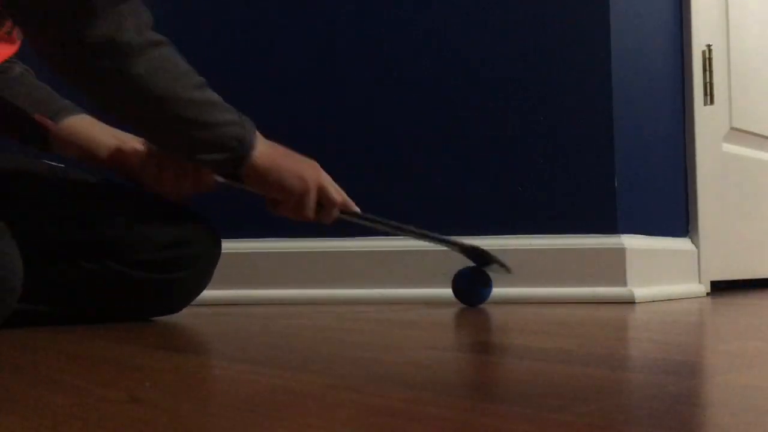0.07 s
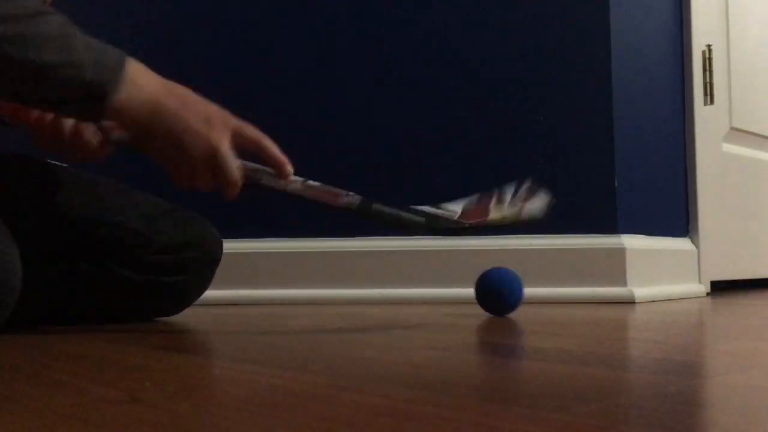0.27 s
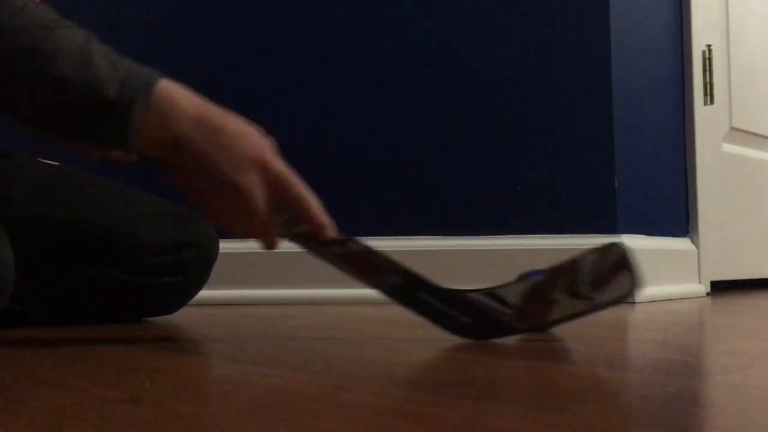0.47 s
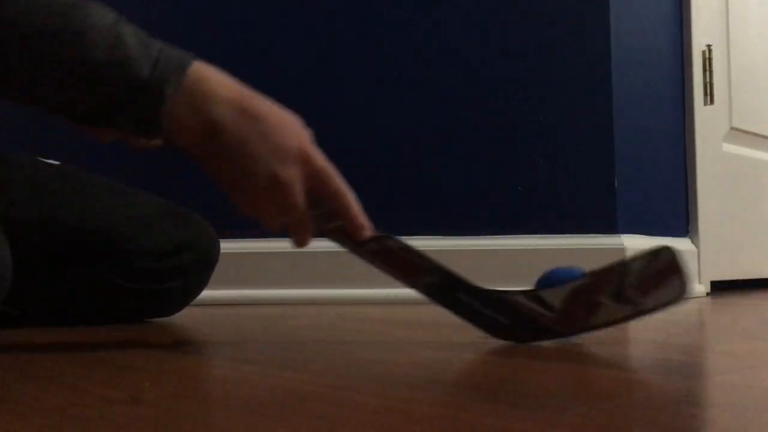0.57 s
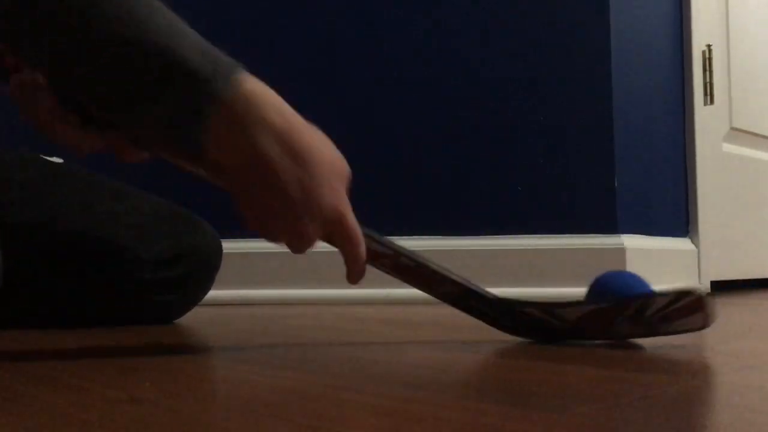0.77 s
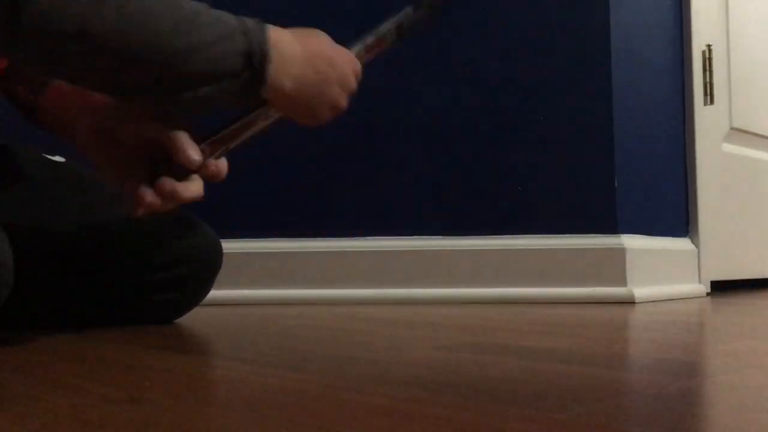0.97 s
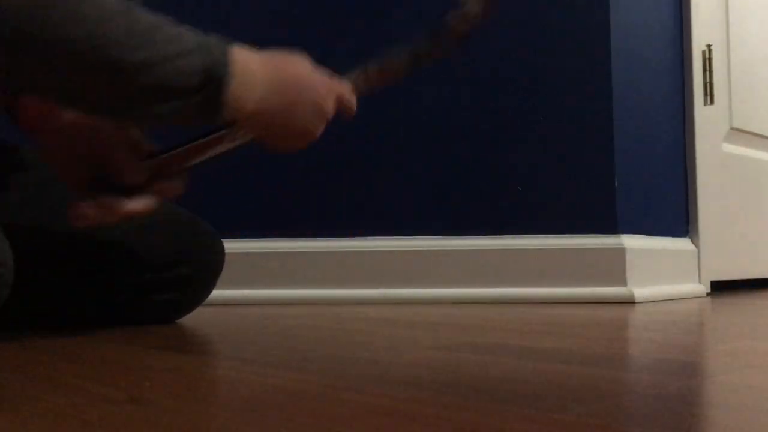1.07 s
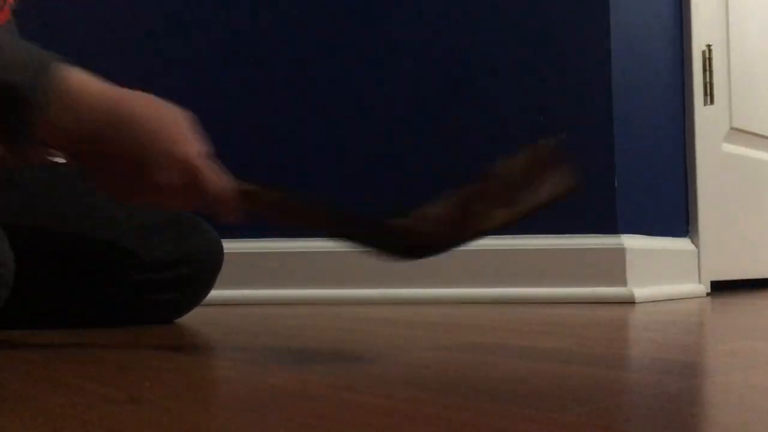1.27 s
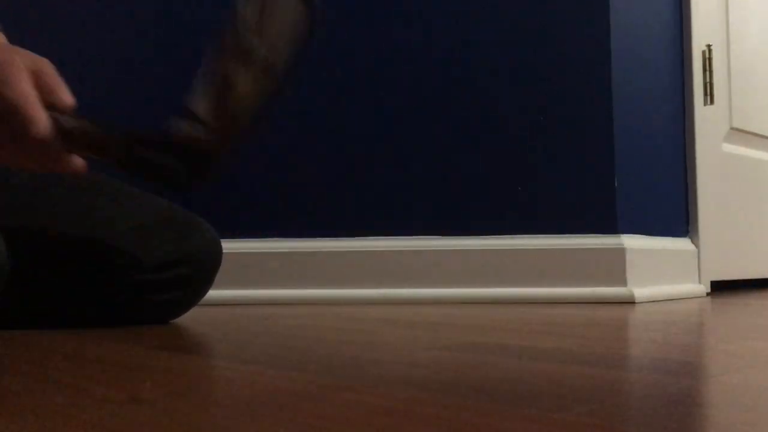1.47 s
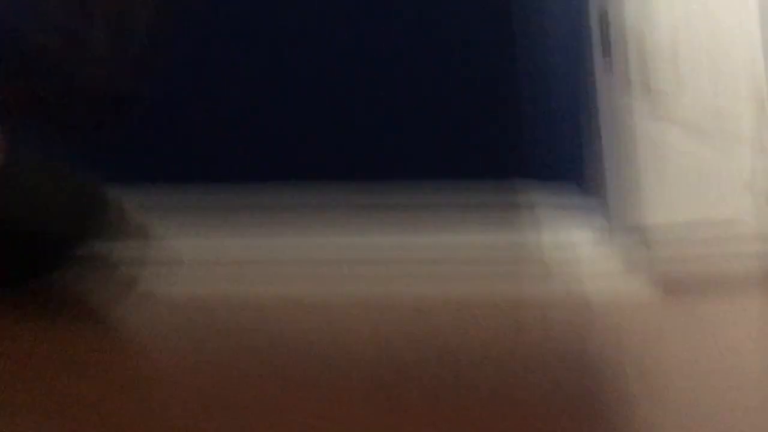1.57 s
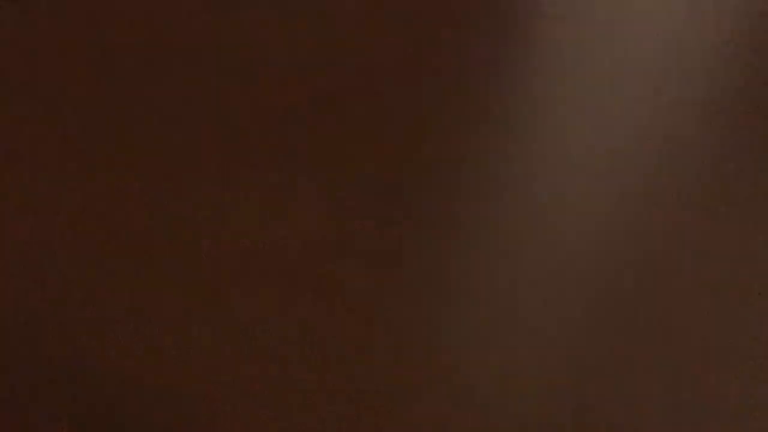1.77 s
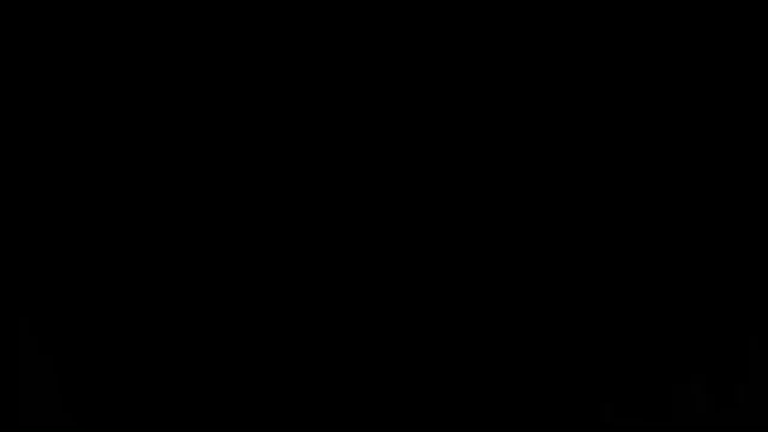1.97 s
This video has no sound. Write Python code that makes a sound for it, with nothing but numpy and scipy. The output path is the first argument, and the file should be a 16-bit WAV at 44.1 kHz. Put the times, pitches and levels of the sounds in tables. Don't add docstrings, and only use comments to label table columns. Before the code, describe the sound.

Close to a device on the floor: two hard wooden knocks, faint ball bounces, a short rising scrape and a dull wall thud, then a heavy blow and crunchy clatter as the device falls over indoors.

```python
import sys
import numpy as np
from scipy import signal
from scipy.fft import rfft, irfft
from scipy.io import wavfile
from scipy.ndimage import uniform_filter1d

SR = 44100
rng = np.random.default_rng(int(sys.argv[2]) if len(sys.argv) > 2 else 0)


def log_audio(samples):
    frames = np.atleast_2d(samples).T
    limited = np.clip(frames, -1, 1)
    pcm = np.round(limited * 32767).astype(np.int16)
    wavfile.write(sys.argv[1], SR, pcm)


def attenuation_scalar(level_db):
    decades = np.asarray(level_db, float) / 20
    return 10 ** decades


N = 88729
LONG = 90000
T = np.arange(LONG) / SR
TS = T[:24000]
HZ = np.maximum(np.fft.rfftfreq(LONG, 1 / SR), 1)
LEAD_S = 64 / SR


def passband(x, lo_hz, hi_hz, order=1):
    edges_hz = [lo_hz, min(hi_hz, .45 * SR)]
    return signal.sosfilt(signal.butter(order, edges_hz, "band", fs=SR, output="sos"), x)


def unit(x):
    return x / np.sqrt(np.sum(x ** 2))


def steady(x):
    return unit(x) * np.sqrt(len(x))


def noise_band(lo_hz, hi_hz, length=LONG):
    return steady(passband(rng.standard_normal(length), lo_hz, hi_hz, order=2))


def shaped(x, tone):
    hz, db = np.array(tone, float).T
    return irfft(rfft(x) * attenuation_scalar(np.interp(np.log(HZ), np.log(hz), db)), LONG)


def later(x, s):
    k = int(round(s * SR))
    return np.concatenate([np.zeros(max(k, 0)), x[max(-k, 0):], np.zeros(LONG)])[:LONG]


def curve(rows):
    s, db = np.array(rows).T
    return uniform_filter1d(attenuation_scalar(np.interp(T, s, db, left=-140, right=-140)), 120)


def walk(rate_hz):
    k = int(SR / rate_hz)
    steps = np.repeat(rng.standard_normal(LONG // k + 1), k)
    return 1.3 * uniform_filter1d(uniform_filter1d(steps, k), k)[:LONG]


def bands(noise):
    spectrum = rfft(noise)
    octave = np.log2(np.maximum(np.fft.rfftfreq(len(noise), 1 / SR), 1))
    for hz in 32 * 2. ** np.arange(10):
        weight = np.cos(np.pi / 2 * np.clip(octave - np.log2(hz), -1, 1)) ** 2
        yield hz, irfft(spectrum * weight, len(noise))


def echo(x, db, share):
    # f/Hz, t60/s
    room = [(60, 0.17), (150, 0.47), (400, 0.25), (1200, 0.33), (4000, 0.21), (12000, 0.33)]
    rise_s = 0.0023
    hz, t60_s = np.array(room).T
    tail = np.zeros(len(TS))
    for f, band in bands(rng.standard_normal(len(TS))):
        band_t60_s = share * np.interp(np.log(f), np.log(hz), t60_s)
        tail += band * np.exp(-np.log(1000) * TS / band_t60_s)
    tail = unit(tail * (1 - np.exp(-TS / rise_s)))
    return x + attenuation_scalar(db) * signal.fftconvolve(x, tail)[:len(x)]


def ring(hz, db, t60_s):
    attack = np.minimum(TS / 0.00065, 1)
    return attenuation_scalar(db) * np.exp(-np.log(1000) * TS / t60_s) * np.sin(2 * np.pi * hz * TS) * attack


def blows(rows):
    return sum(np.sign(sign) * later(ring(hz, db, t60_s), s) for s, db, hz, t60_s, sign in rows)


def grit(tone, share, scatter_db):
    caught = rng.random(LONG) < share
    grains = rng.standard_normal(LONG) * caught * attenuation_scalar(scatter_db * walk(270))
    return steady(shaped(grains, tone))


def bending(tone, delay):
    click = irfft(np.exp(-4j * np.pi * delay * np.sqrt(HZ)), LONG)
    pulse = np.roll(shaped(click, tone), 64)[:len(TS)]
    pulse = pulse * np.clip(TS / LEAD_S, 0, 1) * (TS < .25)
    pulse = passband(pulse, 80.5, 27000, order=2)
    return pulse / np.max(np.abs(pulse))


def knock(s, hit, tone, modes):
    db, delay, echo_db, ring_db, share, crack_db = hit
    crack_hz, crack_t60_s = 3427, 0.015
    lo_hz, hi_hz = crack_hz / 3.77, crack_hz * 1.037
    after = np.maximum(TS - .0025, 0)

    rings = sum(ring(hz, g, min(t60_s, .19)) for hz, g, t60_s in modes)
    rings = rings * (1 - np.exp(-after / 0.0023))

    crack = noise_band(lo_hz, hi_hz, len(TS)) * np.exp(-np.log(1000) * after / crack_t60_s) * (after > 0)
    click = 1. * (np.cumsum(after > 0) == 1)
    snap = unit(passband(click, lo_hz, hi_hz, order=2)) * np.sqrt(np.sum(crack ** 2))
    crack_echo = echo(snap, echo_db, share) - snap

    wave = echo(bending(tone, delay), echo_db, share)
    return attenuation_scalar(db) * later(wave + attenuation_scalar(crack_db) * (crack + crack_echo) + attenuation_scalar(ring_db) * rings, s - LEAD_S)


def stick_knocks():
    # level/dB, bending delay at 1 Hz/s, echo/dB, ring/dB, echo length share, crack/dB
    first_hit = (-13.5, 0.0431, 4, -4.5, 0.9645, -15.5)
    second_hit = (-5.5, 0.08, -5.5, -6, 1.02, -13.5)
    # f/Hz, level/dB
    first_tone = [(29, -44), (50, -2), (306, -2), (950, -13), (2010, -22.5), (3850, -15.5), (5020, -44),
                  (12900, -50), (16000, -77)]
    second_tone = [(29, -54.5), (50, -46.5), (171, 0.5), (439, -14), (1150, -7), (1620, -18), (4560, -19.5),
                   (13200, -57), (16000, -68)]
    # f/Hz, level/dB, t60/s
    first_modes = [(95, -10, .4), (135.6, -8.5, .4), (232.7, -3, 0.25), (335.6, -0.5, 0.12),
                   (545.6, -16, 0.23), (659, -19, 0.26), (949, -13.5, 0.19), (1117, -8, 0.11)]
    second_modes = [(149, -1.5, 0.47), (340.5, -17.5, 0.13), (590, -15.5, 0.32), (855, -20.5, 0.12),
                    (1140, -5.5, 0.11), (2050, -11, 0.0467), (2086, -25.5, 0.2), (3010, -29, 0.11),
                    (3690, -30.5, .08), (4105, -23.5, 0.15)]
    first = knock(-.004, first_hit, first_tone, first_modes)
    return first + knock(.5193, second_hit, second_tone, second_modes)


def wall_hit():
    # level/dB, bending delay at 1 Hz/s, echo/dB, ring/dB, echo length share, crack/dB
    hit = (-13, 0.08, 6.5, -9.5, 0.78, -20)
    # f/Hz, level/dB
    tone = [(29, -42.5), (50, -11), (252, -3.5), (408, -6), (678, -4), (1240, -25), (3100, -33),
            (12900, -54.5), (16000, -70.5)]
    # f/Hz, level/dB, t60/s
    modes = [(270.8, 3, 0.14), (420, -20, 0.24), (510, 1, 0.15), (649, -1, 0.24), (904, -8, 0.067),
             (980, -4.5, 0.19), (1116, -19, 0.24), (1640, -13, 0.11)]
    return knock(1.0680, hit, tone, modes)


def phone_struck():
    # level/dB, bending delay at 1 Hz/s, echo/dB, ring/dB, echo length share, crack/dB
    hit = (-6.5, 0.0761, -12.5, -16, 0.94, -12.5)
    # f/Hz, level/dB
    tone = [(29, -44), (50, 4.5), (229, -3), (559, -5.5), (1020, -11), (2620, -26), (9410, -33),
            (15000, -54.5)]
    # f/Hz, level/dB, t60/s
    modes = [(145, 5, 0.18), (567, -15, .2), (663, -21, 0.18), (900, -18, 0.26), (1300, -15, 0.11)]
    return knock(1.6506, hit, tone, modes)


def topple():
    # t/s, level/dB, f/Hz, t60/s, sign
    jolts = [(1.6515, 0, 938, 0.015, 1), (1.6544, -7.5, 325, 0.0065, 1), (1.6552, -4.5, 169.5, 0.029, -1),
             (1.657, -4.5, 83, 0.057, 1), (1.6837, -24, 900, 0.017, 1), (1.6862, -8, 250, 0.015, 1),
             (1.7012, -15.5, 398, 0.011, 1), (1.7048, -15.5, 191, 0.027, -1), (1.712, -31, 145, 0.12, 1),
             (1.857, -41, 198, 0.06, 1), (1.886, -32.5, 240, 0.039, -1), (1.893, -25, 433, 0.042, 1),
             (1.9028, -12.5, 420, 0.031, 1), (1.9066, -8.5, 180, 0.018, 1), (1.9155, -2, 518, 0.015, 1),
             (1.9187, -7, 168, 0.0365, -1), (1.9215, -6, 198, 0.025, 1), (1.9268, -7.5, 161, 0.019, 1),
             (1.9298, -4.5, 65, 0.077, -1), (1.937, -6, 47, 0.086, 1), (1.9543, -3, 560, 0.01, -1),
             (1.9556, -5, 115, 0.027, 1), (1.9675, -15, 400, 0.016, 1)]
    # t/s, level/dB
    squeak = [(1.902, -44), (1.905, -44), (1.914, -26), (1.917, -22.5), (1.923, -24), (1.926, -35)]
    # t/s, level/dB, centre f/Hz
    rattle = [(1.652, -17, 2025), (1.6524, -18, 9070), (1.656, -12.5, 9050), (1.6566, -16.5, 9900),
              (1.664, -30, 9000), (1.6744, -32.5, 10070), (1.6833, -32, 1380), (1.685, -32, 9000),
              (1.688, -19.5, 9170), (1.6908, -21.5, 7880), (1.701, -27, 1860), (1.709, -27.5, 8900),
              (1.7192, -32, 8960), (1.9023, -13.5, 2300), (1.914, -18, 1940), (1.9243, -5, 1900),
              (1.9257, -2, 2436), (1.9259, -14.5, 5600), (1.9358, -49, 10000), (1.9498, -14, 2220),
              (1.9541, -16, 2580), (1.9555, -25, 8930), (1.9605, -40, 9810), (1.9686, -17, 1900)]
    # t/s, level/dB
    crunch = [(1.87, -62), (1.9, -48.5), (1.905, -36), (1.922, -30), (1.929, -49), (1.95, -31),
              (1.975, -42), (2.012, -57)]
    # f/Hz, level/dB
    crunch_tone = [(240, -74.5), (400, -16.5), (615, -7.5), (1550, -21), (3130, -27), (9000, -74),
                   (11700, -86), (19800, -120)]
    # t/s, level/dB
    graze = [(1.626, -54.5), (1.637, -59), (1.641, -34), (1.65, -23), (1.652, -31)]
    # t/s, level/dB
    slide = [(1.925, -68), (1.935, -45), (1.96, -44.5), (2.012, -57)]
    squeak_hz, rattle_t60_s, dry_share = 3090, 0.0022, 0.12

    squeal = np.sin(2 * np.pi * squeak_hz * T + 0.284 * walk(300))
    booms = blows(jolts) + curve(squeak) * squeal

    ticks = grit(crunch_tone, .3, 3.) * curve(crunch)
    ticks = ticks + noise_band(330, 1200) * curve(graze)
    ticks = ticks + noise_band(3000, 4400) * curve(slide)
    t = TS[:512]
    for s, db, hz in rattle:
        burst = 2 * (t == 0) + rng.standard_normal(512) * attenuation_scalar(-60 * t / rattle_t60_s)
        burst = passband(burst, hz / 2.8, hz * 1.6, order=3)
        ticks = ticks + attenuation_scalar(db) * later(burst / np.max(np.abs(burst)), s - .0003)
    return echo(booms, -16, dry_share) + echo(ticks, -18.5, dry_share)


def ball():
    # t/s, level/dB
    bounces = [
        (0.655, -30),
        (0.664, -22.5),
        (0.684, -31),
        (0.7296, -26),
        (0.779, -34.5),
        (0.807, -36),
    ]
    # f/Hz, level/dB
    tone = [(35, -42.5), (60, -13), (250, 13), (600, -5), (900, -12), (1710, -29.5), (6000, -33.5),
            (7800, -61), (13200, -120)]
    pat = echo(bending(tone, 0.0557), -1, 0.46) + ring(152.8, -16.5, 0.56)
    return sum(attenuation_scalar(db) * later(pat, s - LEAD_S) for s, db in bounces)


def sweep():
    # t/s, pressure/dB
    pressure = [(.62, -58), (.81, -69), (.845, -46.5), (.865, -37.5), (.873, -27.5), (.886, -27.5),
                (.892, -39), (.8955, -21.5), (.898, -38.5)]
    # f/Hz, level/dB
    tone = [(240, -23), (400, -12), (753, -6.5), (1510, -9.5), (1650, -10), (1840, 1), (2750, -12),
            (3870, -5.5), (16000, -47)]
    # f/Hz, level/dB, t60/s
    blade_modes = [(603, -6, .02), (1510, 0, .025), (1810, -7, .015), (2110, -5, .015), (3300, -4, .012),
                   (3850, -4, .012), (4380, -4, .015)]
    # t/s, pressure/dB
    drag_pressure = [(.8, -71), (.835, -45.5), (.86, -38), (.89, -40), (.93, -44), (.99, -67.5)]
    # t/s, level/dB
    sleeve = [(.7, -73), (.77, -64), (.87, -57.5), (.92, -66.5), (.965, -64.5), (.99, -108)]
    rub = grit(tone, 0.42, 2) * curve(pressure)
    blade_ring = unit(sum(ring(*mode) for mode in blade_modes))
    blade = attenuation_scalar(-9) * signal.fftconvolve(rub, blade_ring)[:LONG]
    drag = noise_band(300, 940) * curve(drag_pressure) * attenuation_scalar(2.4 * walk(100))
    swish = noise_band(4700, 13000) * curve(sleeve)
    return echo(rub, -8.5, 1) + blade + swish + drag


def taps():
    # t/s, level/dB, f/Hz, t60/s, sign
    contacts = [(.008, -16, 355, 0.074, 1), (.035, -18, 274, 0.017, 1), (.5198, -13, 2026, 0.023, 1),
                (.5198, -16, 3590, 0.018, 1), (.5198, -12.5, 3940, 0.016, 1), (.5222, -4.5, 286, 0.018, 1),
                (.5385, -16.5, 260.8, .04, 1), (.533, -16.5, 1143, 0.026, 1), (.8848, -16.5, 296, 0.035, 1),
                (.8938, -24.5, 287, 0.019, 1)]
    return echo(passband(blows(contacts), 140, 13000, order=2), -11, .7)


def air():
    # f/Hz, level/dB
    tone = [(15, -25.5), (40, -0.5), (157, -12), (310, -16.5), (400, -18), (503, -23), (640, -22),
            (1000, -29.5), (16000, -48)]
    # t/s, level/dB
    rumble = [(1.07, -75), (1.11, -32.5), (1.16, -43.5), (1.3, -53), (1.42, -58)]
    # start/s, end/s, f/Hz
    whines = [(.37, .48, 2270), (.33, .5, 5405), (.506, .522, 1200), (.508, .522, 3090)]
    whine_db = (-68, -79, -46, -58)
    drifting = sum(band * attenuation_scalar(1.2 * walk(3.47)) for _, band in bands(rng.standard_normal(LONG)))
    hush = steady(shaped(drifting, tone))
    out = passband(hush, 64, 15500, order=3) * attenuation_scalar(-56)
    out = out + noise_band(59.3, 98.0) * curve(rumble)
    for (start_s, end_s, hz), db in zip(whines, whine_db):
        swell = np.sin(np.pi * np.clip((T - start_s) / (end_s - start_s), 0, 1)) ** .5
        squeal = np.sin(2 * np.pi * hz * T + 1.3 * walk(200))
        out = out + attenuation_scalar(db + 2.2 * walk(150)) * swell * squeal
    return out


def scene():
    hits = stick_knocks() + wall_hit() + phone_struck()
    return (hits + topple() + ball() + sweep() + taps() + air())[None, :N]


def roll_off(x):
    return signal.sosfilt(signal.butter(12, 16530, fs=SR, output="sos"), x)


def record(dry):
    return roll_off(np.tanh(0.78 * dry) / 0.65)


dry = scene()
out = record(dry)
log_audio(out)
```